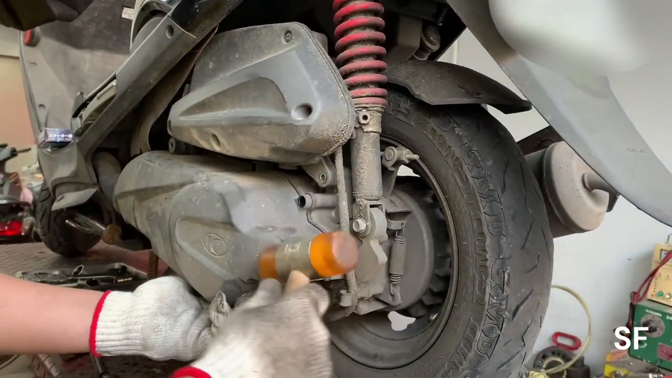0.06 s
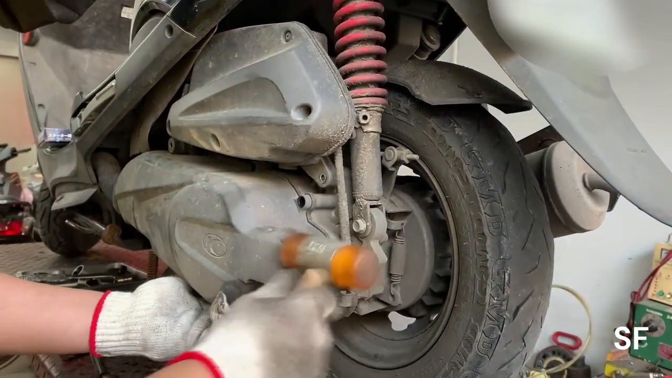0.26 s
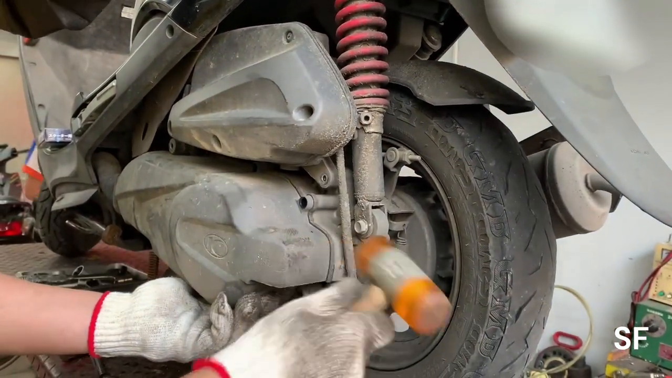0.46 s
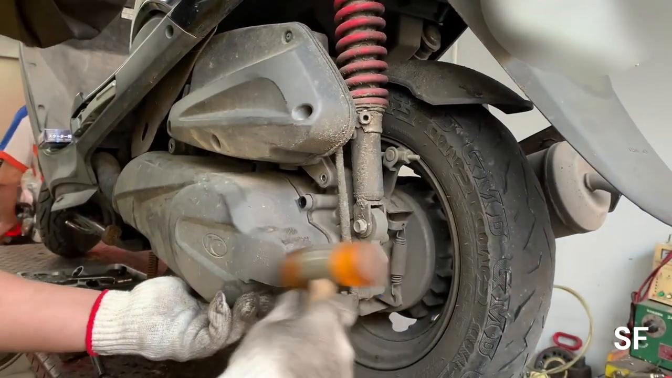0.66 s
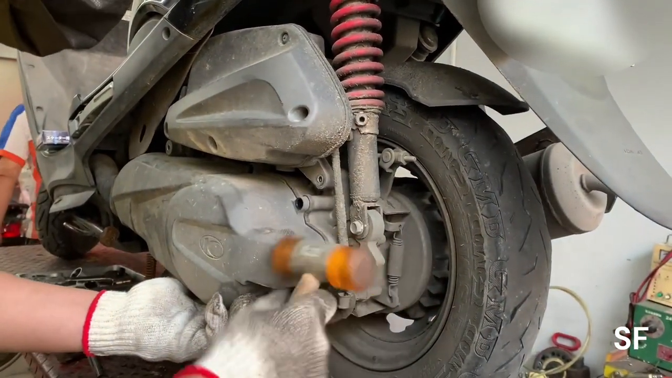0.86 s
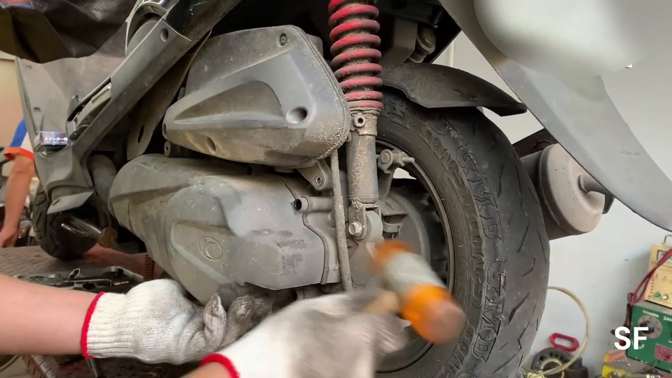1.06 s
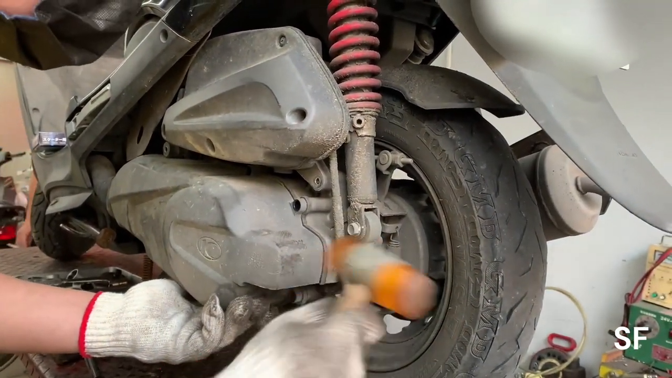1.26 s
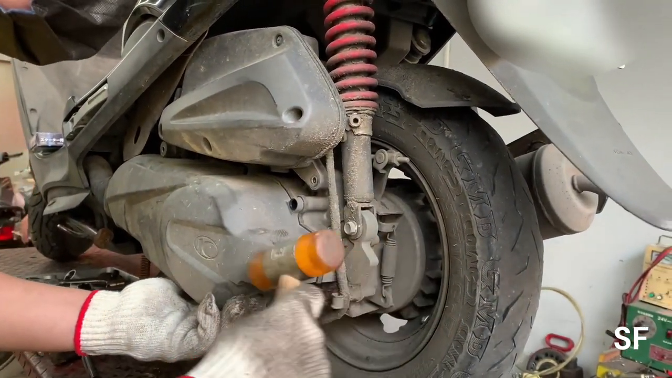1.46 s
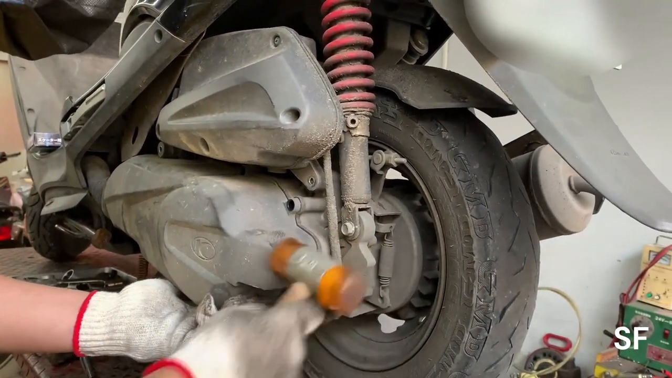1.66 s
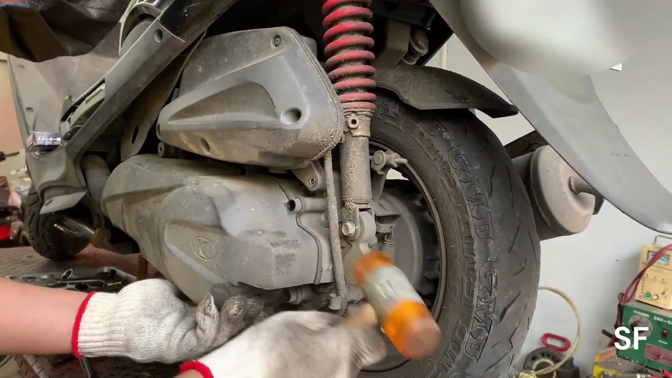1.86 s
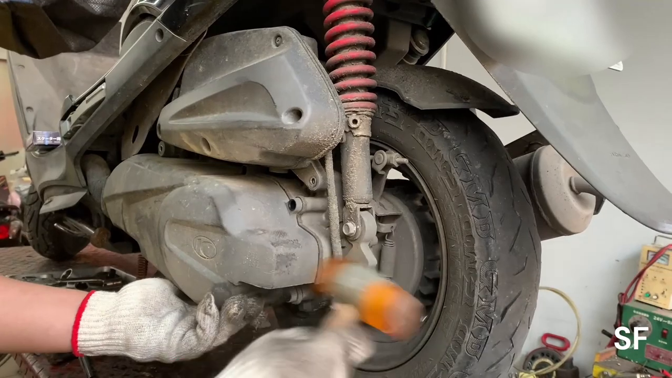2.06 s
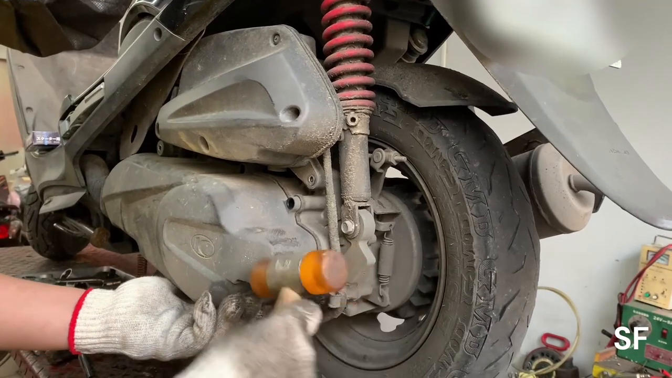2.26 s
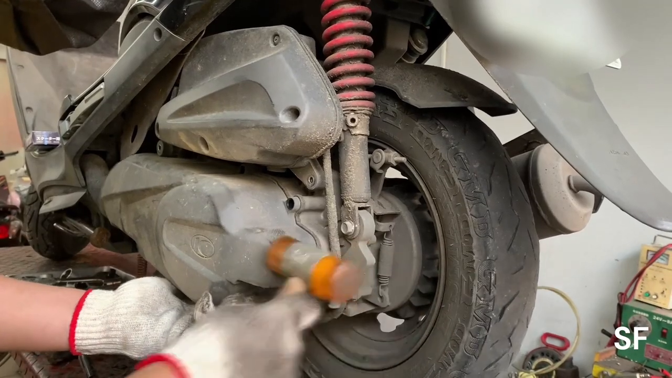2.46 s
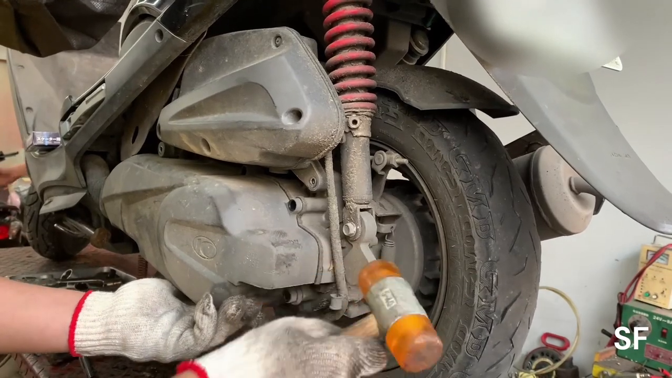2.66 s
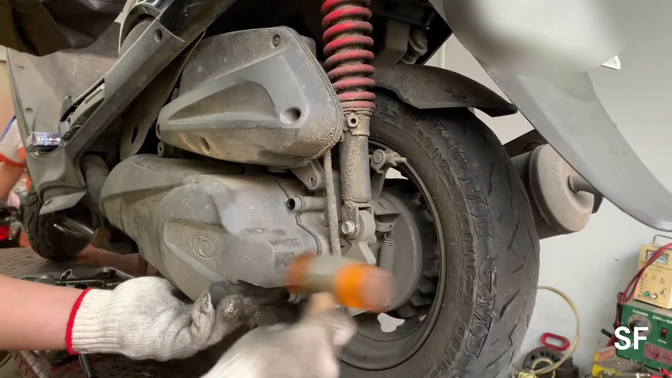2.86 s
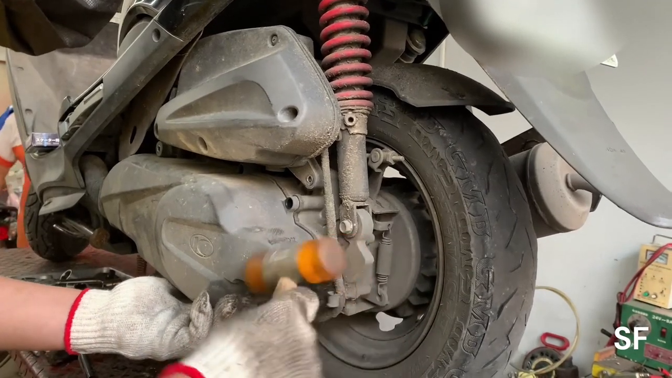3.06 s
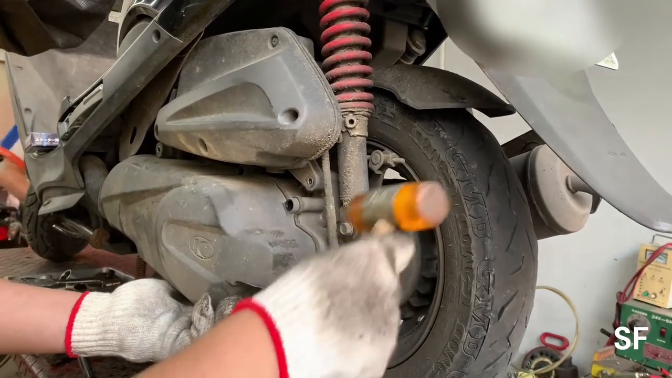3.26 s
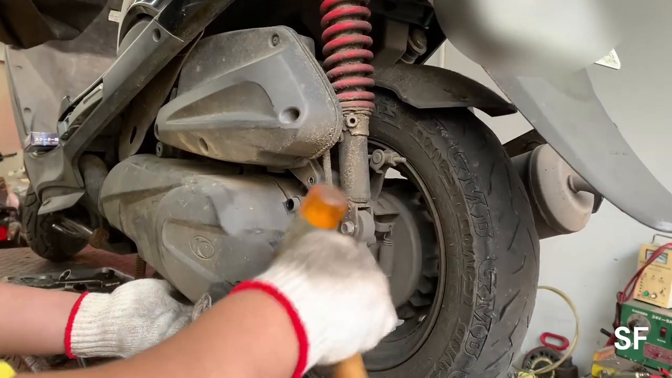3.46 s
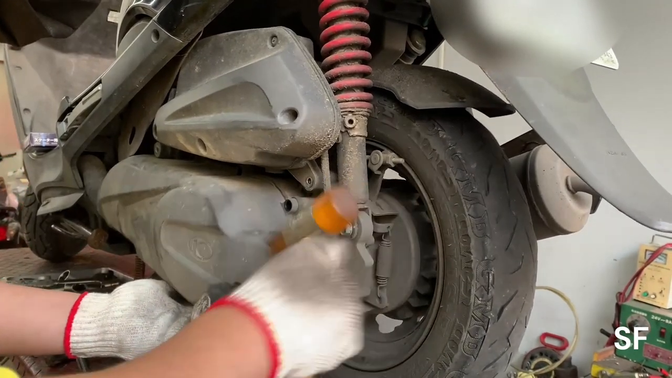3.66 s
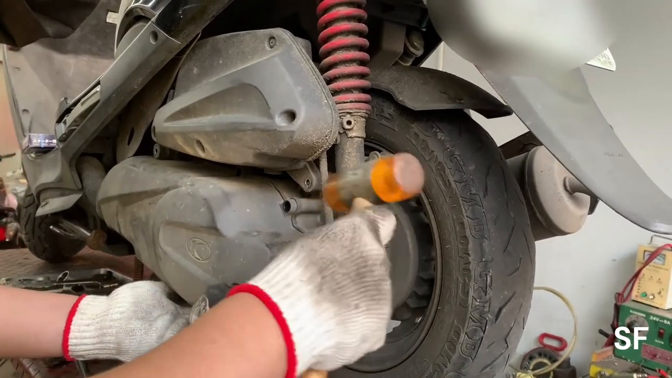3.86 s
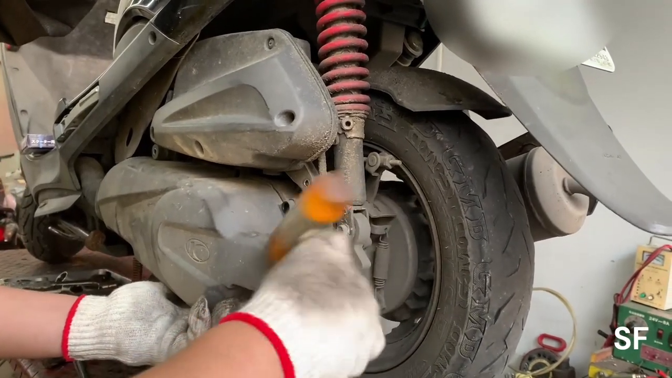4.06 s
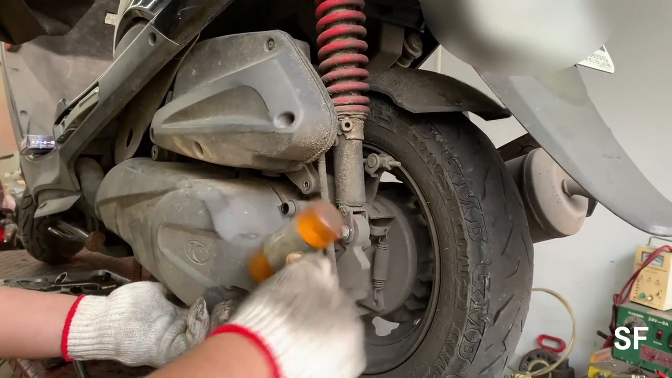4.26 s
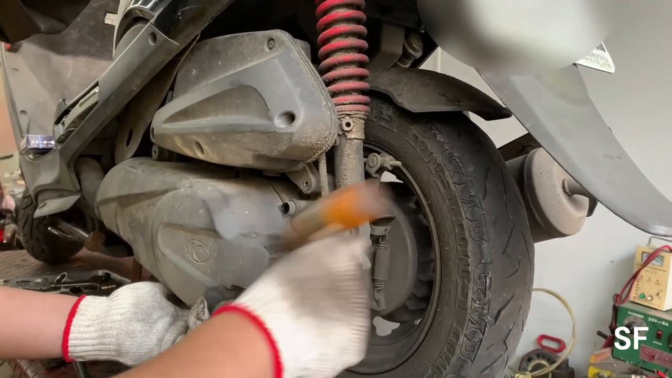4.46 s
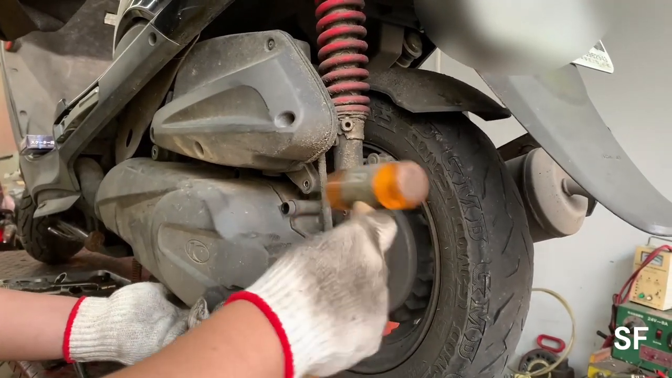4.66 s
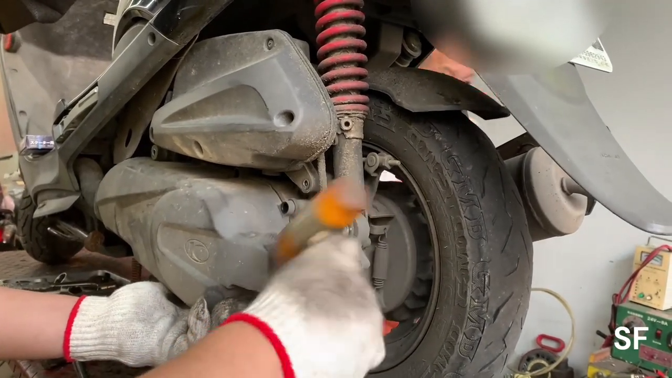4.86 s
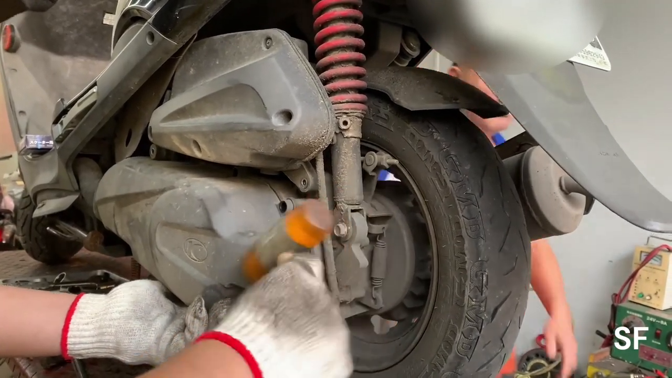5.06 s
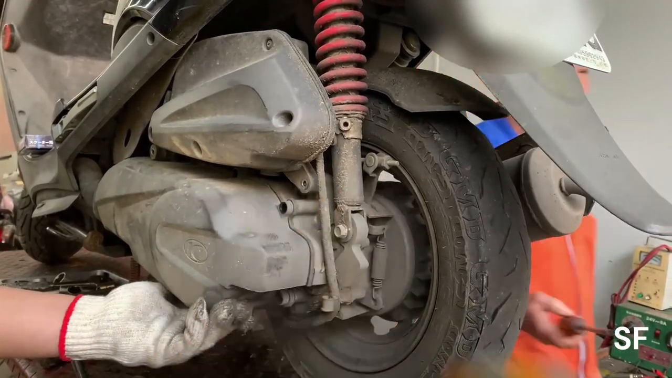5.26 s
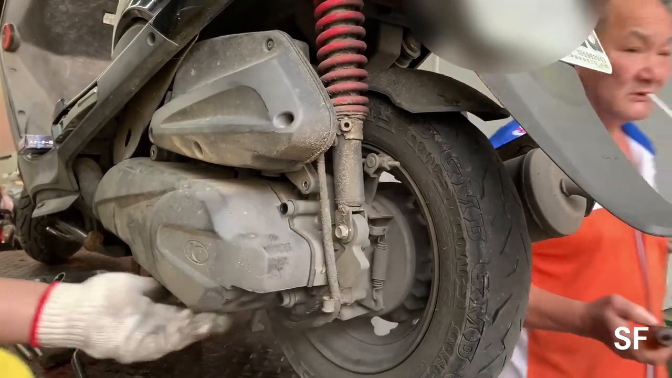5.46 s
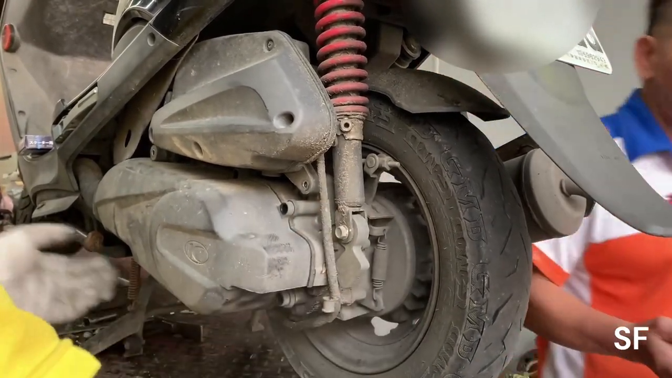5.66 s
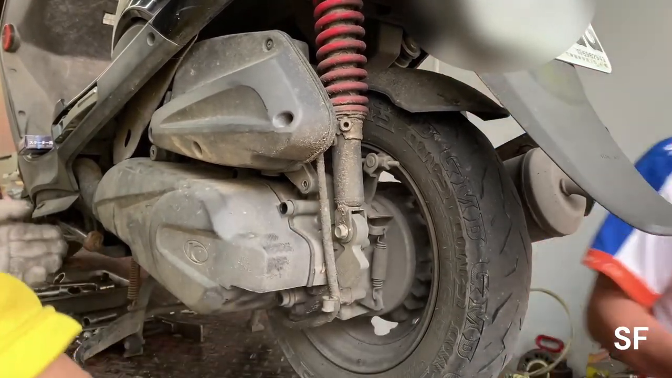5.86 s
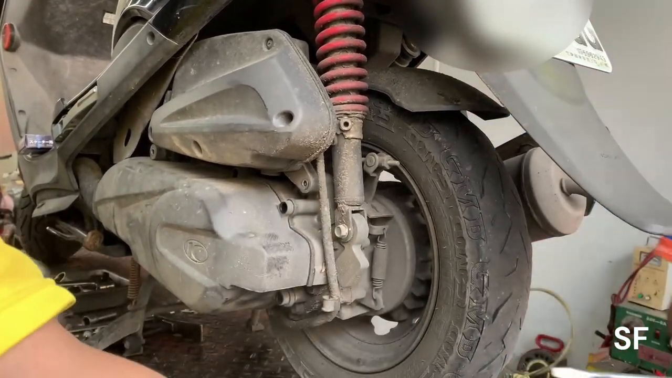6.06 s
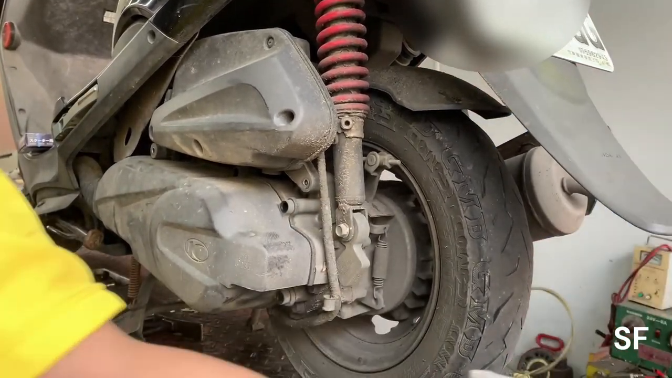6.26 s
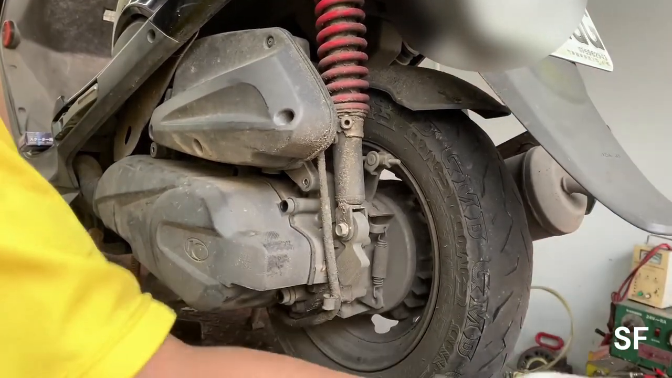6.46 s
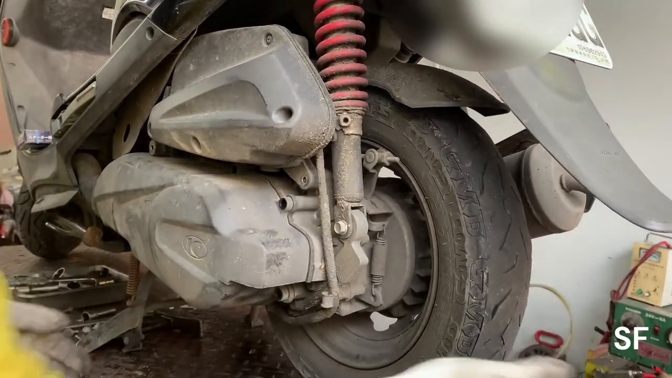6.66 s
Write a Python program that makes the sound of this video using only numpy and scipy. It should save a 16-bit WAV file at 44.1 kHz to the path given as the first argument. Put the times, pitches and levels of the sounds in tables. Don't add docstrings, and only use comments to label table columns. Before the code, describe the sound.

Loud mallet strikes, caught by a close stereo phone microphone, run evenly along a scooter's metal casing. At first they are woody, boomy and rattling, then drier, brighter cracks with less low end. Short room reverberation follows each one. After the last strike the tails fade, a few quiet hollow taps tumble, and only faint traffic noise and idling engine hum remain.

```python
import sys
import numpy as np
from scipy import signal
from scipy.fft import rfft, irfft, next_fast_len
from scipy.io import wavfile
from scipy.ndimage import uniform_filter1d

SR = 44100
rng = np.random.default_rng(int(sys.argv[2]) if len(sys.argv) > 2 else 0)


def natural_amplitude(level_db):
    exponent = np.asarray(level_db, float) / 20
    return 10 ** exponent


def wav_record(signal):
    frames = np.transpose(np.atleast_2d(signal))
    bounded = np.clip(frames, -1, 1)
    quanta = np.round(bounded * 32767).astype(np.int16)
    wavfile.write(sys.argv[1], SR, quanta)


N = 295911


def on_log(table, hz, axis=1):
    rows = np.array(table, float)
    return np.interp(np.log(np.maximum(hz, 1)), np.log(rows[:, 0]), rows[:, axis])


def curve(table):
    return natural_amplitude(np.interp(np.arange(N) / SR, *np.transpose(table)[:2]))


def shaped(x, gain):
    size = next_fast_len(x.shape[-1], True)
    hz = np.arange(size // 2 + 1) * SR / size
    return irfft(rfft(x, size) * gain(hz), size)[..., :x.shape[-1]]


def unit(x):
    return x / np.sqrt(np.mean(x ** 2))


def peak1(x):
    return x / np.max(np.abs(x))


def add(track, sound, s):
    i = int(round(s * SR))
    sound = sound[max(-i, 0):N - i]
    track[max(i, 0):max(i, 0) + len(sound)] += sound


def walk(rate):
    k = int(SR / rate)
    steps = np.repeat(rng.standard_normal(N // k + 1), k)
    return 1.39 * uniform_filter1d(uniform_filter1d(steps, k), k)[:N]


def crack(decay_ms):
    # (frequency [Hz], density [dB per Hz])
    snap = [(880, -17), (1500, 7), (2380, -10.5), (3510, -14.5), (5080, -12.5), (6460, -12), (9250, -12),
            (11800, -19), (13000, -20), (15400, -38), (16400, -26)]
    # (time [ms], level [dB])
    touches = [
        (0, -6.5),
        (3.0, -7.5),
        (10.0, -24),
    ]
    ms_axis = np.arange(4096) * 1000 / SR
    envelope = 0
    for ms, db in touches:
        decay = np.exp(-np.maximum(ms_axis - ms, 0) / decay_ms)
        envelope = envelope + natural_amplitude(db) * (ms_axis >= ms) * decay
    noise = shaped(rng.standard_normal(len(ms_axis)), lambda hz: natural_amplitude(on_log(snap, hz)))
    return peak1(noise * envelope)


def ring(modes, scatter_db, detune, contact_ms):
    t = np.arange(SR // 7) / SR
    hz, db, t60 = np.repeat(np.transpose(modes), 2, axis=1)[:, :, None]
    luck = rng.standard_normal((2, len(hz), 1))
    level = natural_amplitude(db + scatter_db * luck[0])
    decay = np.exp(-np.log(1000) * t / t60)
    free = level * decay * np.sin(2 * np.pi * hz * (1 + detune * luck[1]) * t)
    push = np.sin(np.pi * np.clip(t[:200] / (contact_ms / 1000), 0, 1))
    return np.convolve(free.sum(axis=0), push)[:len(t)]


def shudder(jolts, bands, rise_ms):
    first = int(jolts[0][0] * SR)
    last = min(int((jolts[-1][0] + 1) * SR), N)
    kicks, out = np.zeros(last - first), np.zeros((2, N))
    for s, db in jolts:
        kicks[int(s * SR) - first] = natural_amplitude(2 * db)
    kicks = signal.lfilter([1000 / rise_ms / SR], [1, -np.exp(-1000 / rise_ms / SR)], kicks)
    noise = rng.standard_normal((2, N))[:, :len(kicks)]
    for k, (hz, width, db, t60, alike) in enumerate(bands):
        power = signal.lfilter([1], [1, -1000 ** (-2 / t60 / SR)], kicks + 1e-20)
        steep = signal.butter(2, [hz - width / 2, hz + width / 2], "band", fs=SR, output="sos")
        banded = signal.sosfilt(steep, np.roll(noise, k * SR // 5, axis=1))
        mid, side = banded * np.sqrt(SR / 4 / width)
        alike = np.clip(alike, 0, 1)
        pair = np.sqrt(1 + alike) * mid + np.sqrt(1 - alike) * side * np.array([[1], [-1]])
        out[:, max(first, 0):last] += (natural_amplitude(db) * np.sqrt(power) * pair)[:, max(-first, 0):]
    return out


def mallet(blows, modes, frame, contact_ms, reach_db, boom_db):
    return_s, return_db = 0.05, -15.5
    split_hz = 550
    out = np.zeros(N)
    low = [m for m in modes if m[0] < split_hz]
    high = [m for m in modes if m[0] >= split_hz]
    for s, db, crack_db, _ in blows:
        add(out, natural_amplitude(db + crack_db + reach_db + 6) * crack(decay_ms=1.0), s)
        add(out, natural_amplitude(db + reach_db) * peak1(ring(high, 1.8, 0.0411, contact_ms)), s)
        boom = natural_amplitude(db + boom_db + reach_db - 6) * peak1(ring(low, 1.5, 0.024, 0.76))
        add(out, boom, s + 0.0023)
        add(out, natural_amplitude(return_db) * boom, s + return_s)
    panels = [b for b in frame if b[0] < split_hz]
    fittings = [b for b in frame if b[0] >= split_hz]
    panel_jolts = [(row[0], row[1] + boom_db + reach_db - 6.0) for row in blows]
    fitting_jolts = [(row[0], row[1] + row[3]) for row in blows]
    out = out + shudder(panel_jolts, panels, rise_ms=0.65)
    rattle = natural_amplitude(2 * walk(70))
    return out + rattle * shudder(fitting_jolts, fittings, rise_ms=0.33)


def rim_knocks(blows):
    # (frequency [Hz], level [dB], t60 [s])
    rim_modes = [(193, -5, 0.071), (251, -10, 0.35), (285.2, 0, 0.14), (377.6, 6, 0.066), (375, 3.5, 0.09),
                 (536, -10.5, 0.14), (663, -2, 0.032), (736.4, 7, 0.042), (985, 1.5, 0.042),
                 (1090, 2, 0.054), (1250, 9, 0.023), (1644, 5.5, 0.043), (2200, -44, 0.079),
                 (2424, -5.5, 0.08), (3030, -51, 0.023), (5240, -30, .02), (6740, -2, .015)]
    # (frequency [Hz], width [Hz], level [dB], t60 [s], left-right likeness [0-1])
    rim_frame = [(184.3, 33, -34, 0.79, 0.95), (264.4, 61.6, -16.5, 0.3, 0.87),
                 (387.7, 75, -21.5, 0.47, 0.33), (663, 340, -14.5, 0.15, 0.34), (1006, 71, -30, 0.51, 0.5),
                 (1172.3, 47, -28.5, 0.53, 0.6), (1282.5, 71, -27, 0.58, 0.28),
                 (482, 162, -19.5, 0.11, 0.1), (326.6, 76, -24, 0.26, 0.96), (1700, 960, -22, 0.23, 0.2),
                 (2900, 4500, -30, 0.26, 0.16), (5100, 1700, -43.5, 0.07, 0), (7040, 730, -49, 0.23, 0.3),
                 (13400, 9200, -41, 0.4, 0.4)]
    return mallet(blows, rim_modes, rim_frame, contact_ms=0.39, reach_db=13.52, boom_db=3.5)


def workshop_walls(blows):
    # (frequency [Hz], width [Hz], level [dB], t60 [s], left-right likeness [0-1])
    shop = [(144, 123, -26, 0.3, .95), (320, 200, -32, 0.99, 0), (734, 470, -29.5, 0.77, 0.01),
            (1286, 360, -32.5, 0.75, 0), (2380, 1770, -35.5, 0.75, 0.07), (5800, 6200, -39.5, 0.75, 0.25),
            (13200, 6500, -49.5, 0.85, 0.4)]
    return shudder([(row[0], row[1] + row[3]) for row in blows], shop, rise_ms=2.2)


def revs():
    # (start [s], end [s], level [dB])
    pull_times = [
        (-.2, 0.106, -38.5),
        (2.394, 4.337, -38.5),
    ]
    rise_db_s, fall_db_s, idle_db = 31.5, 36, -54
    t = np.arange(N) / SR
    pulls = []
    for start, end, db in pull_times:
        climb = rise_db_s * np.maximum(start - t, 0)
        fall = fall_db_s * np.maximum(t - end, 0)
        pulls.append(db - climb - fall)
    return natural_amplitude(np.maximum(np.max(pulls, axis=0), idle_db))


def drone():
    # (multiple of firing rate [1], level [dB])
    orders = [(1.5, -55), (2, -55.5)]
    firing_hz, width_hz = 75.9, 4.3
    shift_hz_per_db = -0.6
    gain = revs()
    wander_hz = firing_hz * (1 + 0.0118 * walk(3.8))
    tone_hz = wander_hz + shift_hz_per_db * 20 * np.log10(gain / gain.max())
    tone = np.sqrt(2) * np.sin(2 * np.pi * np.cumsum(tone_hz) / SR) * natural_amplitude(2.1 * walk(11))
    hum = shaped(rng.standard_normal(N), lambda hz: 1 / (1 + (2 * (hz - firing_hz) / width_hz) ** 2))
    idle = 0
    for k, db in orders:
        idle = idle + natural_amplitude(db + 2.2 * walk(5)) * np.sin(2 * np.pi * k * np.cumsum(wander_hz) / SR)
    return unit(tone + natural_amplitude(-12) * unit(hum)) * gain + idle


def street():
    # (frequency [Hz], density [dB per Hz])
    murmur = [(12, -57), (20, -9), (65, -5), (101, -5.5), (193, -6), (216, -13.5), (248, -11), (698, -18.5),
              (1960, -23), (2910, -32), (8650, -46), (9400, -54.5), (14700, -45), (16000, -72)]
    # (time [s], level [dB])
    murmur_level = [(0, -38), (3.0, -42), (4.1, -40.5), (5.2, -47.5), (6.71, -49.5)]
    lag_s = 0.427 / 1000
    out, swell = 0, walk(0.78)
    size = next_fast_len(N, True)
    f = np.arange(1, size // 2 + 2) * SR / size
    mid, side = rfft(rng.standard_normal((2, size))) * natural_amplitude(on_log(murmur, f))
    side = side * np.minimum(0.5 + f / 1500, .8)
    pair = np.array([(mid + side) * np.exp(-2j * np.pi * f * lag_s), mid - side])
    for hz in 30 * 2 ** np.arange(0, 9.5, .5):
        band = irfft(pair * np.exp(-8 * np.log2(f / hz) ** 2), size)[:, :N]
        out = out + natural_amplitude(0.48 * swell + 1.76 * walk(12)) * band
    return unit(out) * curve(murmur_level) * natural_amplitude(3)


def boss_knocks(blows):
    # (frequency [Hz], level [dB], t60 [s])
    boss_modes = [(195.4, -9.5, 0.14), (283.2, -11.5, 0.39), (384.4, 0, 0.11), (691, -7.5, 0.06),
                  (748, -5, 0.1), (950, -10, 0.024), (1168, 2.5, 0.025), (1428, 8, 0.024),
                  (1790, 8.5, 0.017), (2140, -12, 0.039), (2068, -1, 0.064), (2550, 4, 0.037),
                  (2977, 4.5, 0.02), (3450, -13.5, 0.031), (4760, -4, .02)]
    # (frequency [Hz], width [Hz], level [dB], t60 [s], left-right likeness [0-1])
    boss_frame = [(224, 110, -23, 0.56, 1), (257, 122, -17.5, 0.34, 0.89), (398.7, 23.5, -22, 0.53, 0.63),
                  (644, 163, -15.5, 0.19, 0.84), (1003.5, 38, -26.5, 0.5, 0.36),
                  (1193, 130, -25, 0.56, 0.17), (1740, 880, -19, 0.21, 0.15), (2510, 810, -26, 0.45, 0.14),
                  (3400, 1800, -25.5, 0.29, 0.4), (5800, 5400, -29.5, 0.31, 0.43),
                  (2880, 3300, -32, 1, 0.24), (1520, 1400, -31, 1, 0.27), (13560, 5600, -33.5, 0.32, 0.88)]
    return mallet(blows, boss_modes, boss_frame, contact_ms=0.091, reach_db=15.13, boom_db=-11)


def small_part():
    # (time [s], level [dB], pitch [Hz], treble [dB])
    taps = [
        (5.613, -34.5, 320, -2),
        (5.626, -38, 310, 6.5),
        (5.649, -37, 336, -1),
        (5.699, -27, 956, -13),
        (5.78, -25, 975, -11),
        (5.792, -39, 312, 0),
        (5.903, -28.5, 985, -8),
    ]
    # (frequency [Hz], width [Hz], level [dB], t60 [s], left-right likeness [0-1])
    body = [(427, 630, -18, 0.5, 0.63), (890, 720, -15.5, 0.31, 0.39), (2010, 3600, -20.5, 0.33, 0.2),
            (4500, 2400, -33, .08, 0.5)]
    out = np.zeros(N)
    for s, db, hz, treble_db in taps:
        wall = ring([(1.54 * hz, 0, .02), (2.17 * hz, -8, .02)], 1.3, 0.055, 0.28)
        add(out, natural_amplitude(db - 8) * peak1(wall), s)
        hollow = ring([(hz, 0, .03), (0.75 * hz, -10, .03)], 1.4, 0.022, 0.19)
        add(out, natural_amplitude(db + 2.5) * peak1(hollow), s + 0.00199)
        add(out, natural_amplitude(db - 4.5 + treble_db) * crack(decay_ms=1.0), s)
    return out + shudder([row[:2] for row in taps], body, rise_ms=2.2)


def scene():
    # (time [s], blow [dB], crack against
    # blow [dB], shudder against blow [dB])
    blows_on_rim = [(-.03, -10.5, -11, 6.75),
                    (0.251, -13.5, -3, 10), (0.533, -13, -5, 8.5), (0.816, -11, -10, 7), (1.1, -12, -6.5, 5),
                 (1.375, -12, -5.5, 9), (1.643, -10, -7.5, 2.5), (1.907, -11.5, -8.5, 6),
                 (2.178, -11.5, -5.5, 7.5), (2.449, -10.5, -6.5, 8), (2.724, -11, -4.5, 5.5),
                 (2.988, -11, -6, 5)]
    boss_blows = [(3.3613, -10, -12.5, 2), (3.655, -12, -10.5, 3.5), (3.928, -10.5, -12, 0.5),
                  (4.194, -6.5, -15.5, 0.5), (4.4708, -7, -13.5, 0.2), (4.7276, -5, -19, -1),
                  (4.9888, -9.5, -12, 0.8)]
    rim = blows_on_rim
    near = rim_knocks(rim) + boss_knocks(boss_blows)
    walls = workshop_walls(rim + boss_blows)
    tail_fade = natural_amplitude(-27 * np.maximum(np.arange(N) / SR - 5.25, 0))
    return (near + walls) * tail_fade + small_part() + drone() + street()


def top_cut(x):
    return signal.sosfilt(signal.butter(12, 16510, fs=SR, output="sos"), x)


def record(dry):
    # (frequency [Hz], left minus right [dB], share that is common [0-1])
    port_balance = [(61.5, 3.5, 0.77), (304, 2, 0.42), (600, 2.5, 0.11), (1300, 0.5, 0), (4410, 3, 0),
                    (6530, 2, 0.6), (8120, 1, 0.42), (15600, 0.5, 0.96)]
    # (frequency [Hz], left lead [rad])
    port_phase = [(2000, 1.4), (4650, -1.5), (6500, -0.4), (8400, 2.34), (9800, 3.5), (12000, 5),
                  (14200, 8), (15600, 7.5)]
    ceiling = 0.77
    near_lag_s = 0.14 / 1000
    smear_ms, smear_db, smear_hz, smear_top_hz = 4.6, -4.5, 495, 6200
    smear_even = 0.25
    mic_low_hz, mic_top_hz = 43.7, 16100

    size = next_fast_len(N, True)
    hz = np.arange(size // 2 + 1) * SR / size
    both = rfft(ceiling * np.tanh(dry / ceiling), size)
    share = np.clip(on_log(port_balance, hz, axis=2), 0, 1)
    both = share * both.mean(axis=0) + (1 - share) * both
    lead = on_log(port_phase, hz)
    lag = 2 * np.pi * hz * near_lag_s * (1 - hz / 2000)
    phase = np.where(hz < 2000, lead * (hz / 2000) ** 4 - lag, lead)
    twist = natural_amplitude(on_log(port_balance, hz) / 2) * np.exp(.5j * phase)
    ahead = rng.standard_normal(2048) * np.exp(-np.arange(2048) * 1000 / SR / smear_ms)
    ghost = natural_amplitude(smear_db) * np.conj(rfft(ahead, size)) / np.sqrt(smear_ms * SR / 2000)
    ghost = ghost * hz / (hz + smear_hz) / (1 + (hz / smear_top_hz) ** 4)
    even = np.sqrt((1 + smear_even) / (np.abs(1 + ghost) ** 2 + smear_even))
    mic = 1 / (1 - 1j * mic_low_hz / (hz + 1)) ** 2 / (1 + (hz / mic_top_hz) ** 70)
    ports = irfft(both * np.array([twist, 1 / twist]) * (1 + ghost) * even * mic, size)[:, :N]
    return top_cut(np.clip(ports, -.88, .88))


dry = scene()
out = record(dry)
wav_record(out)
```